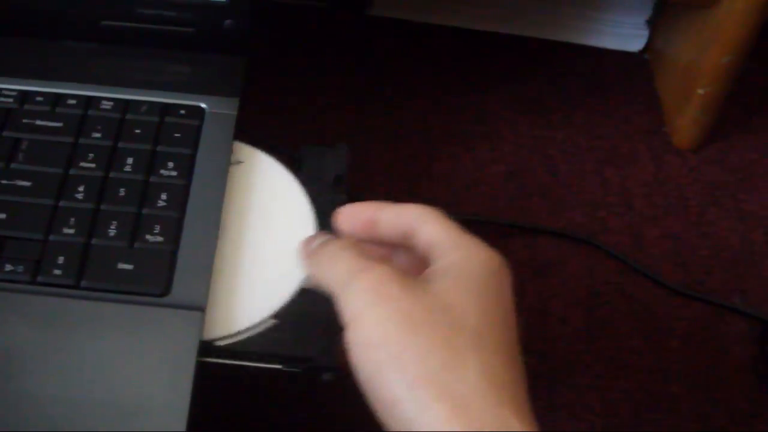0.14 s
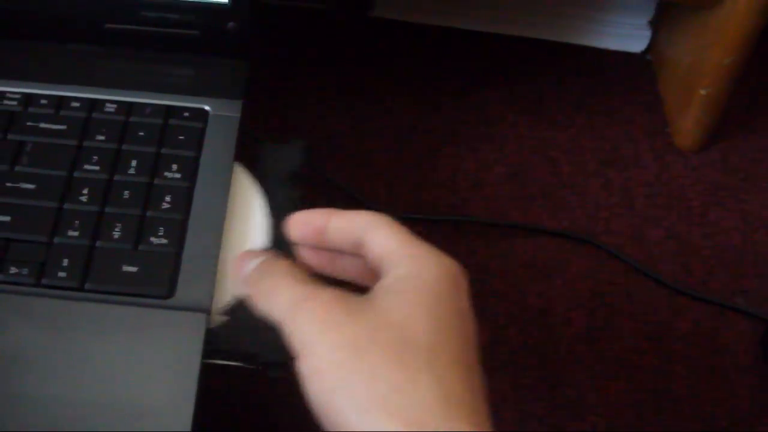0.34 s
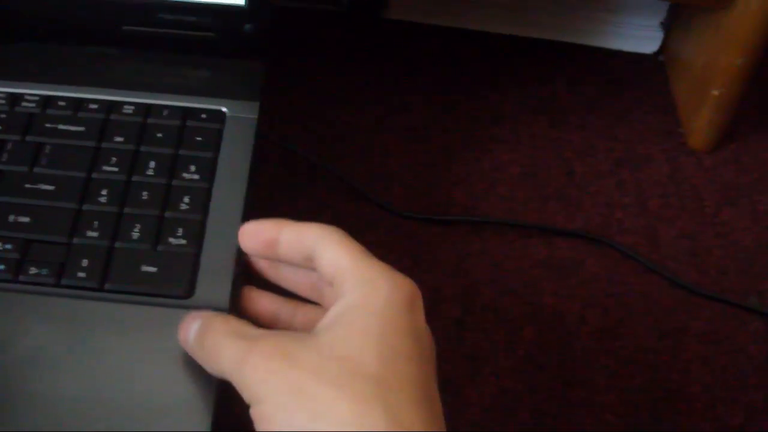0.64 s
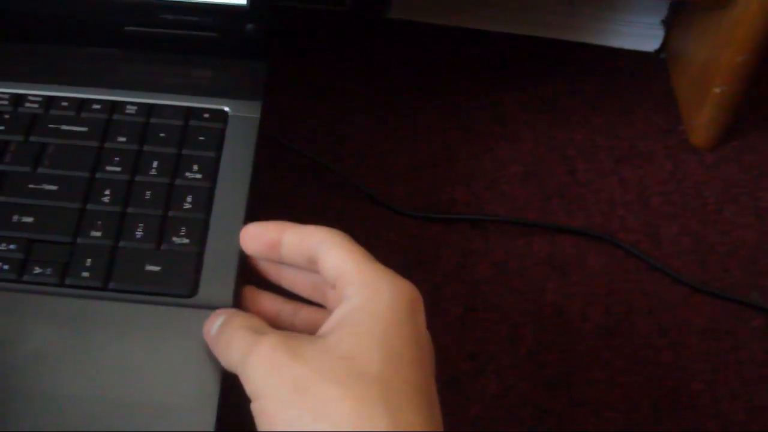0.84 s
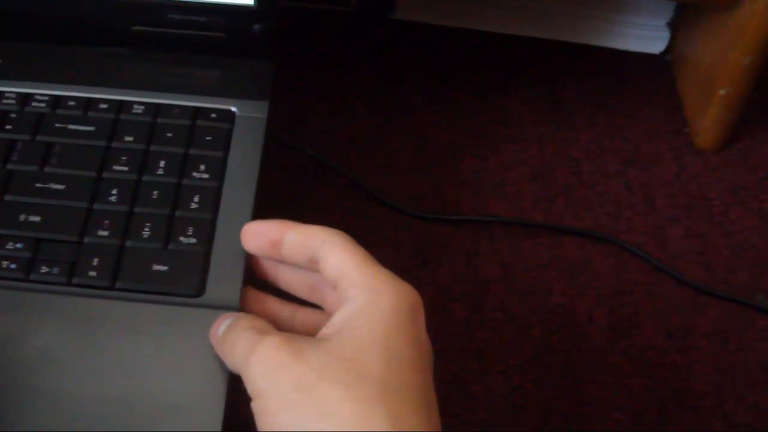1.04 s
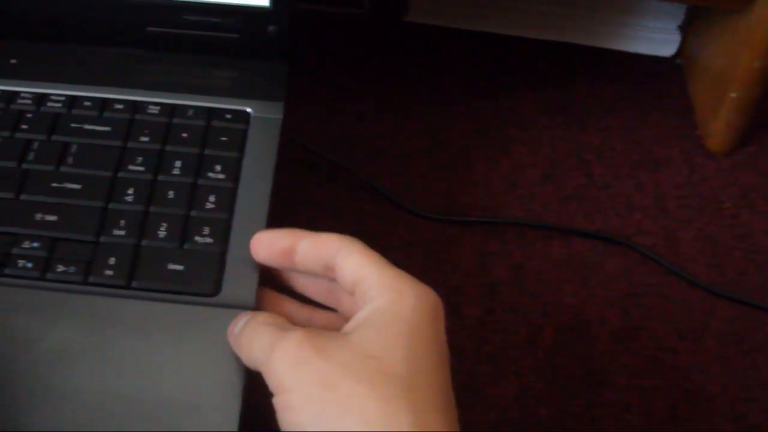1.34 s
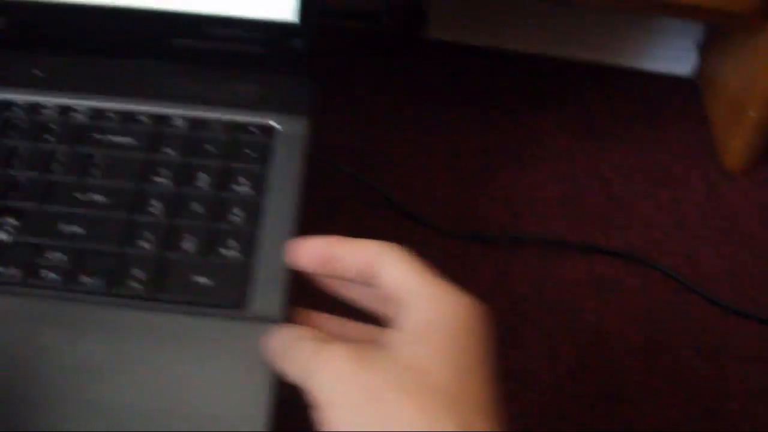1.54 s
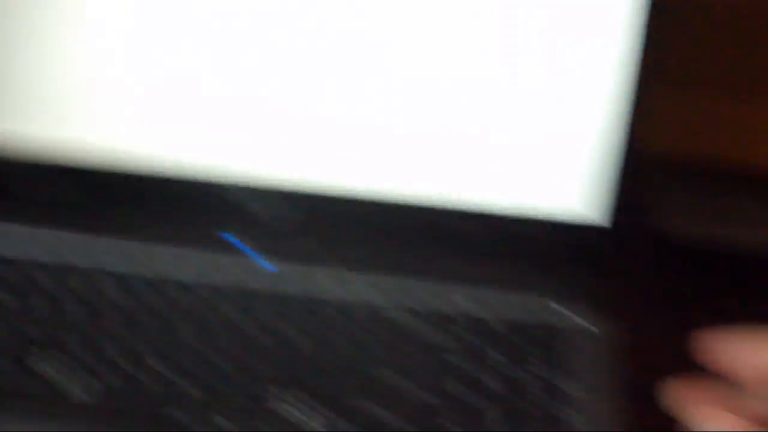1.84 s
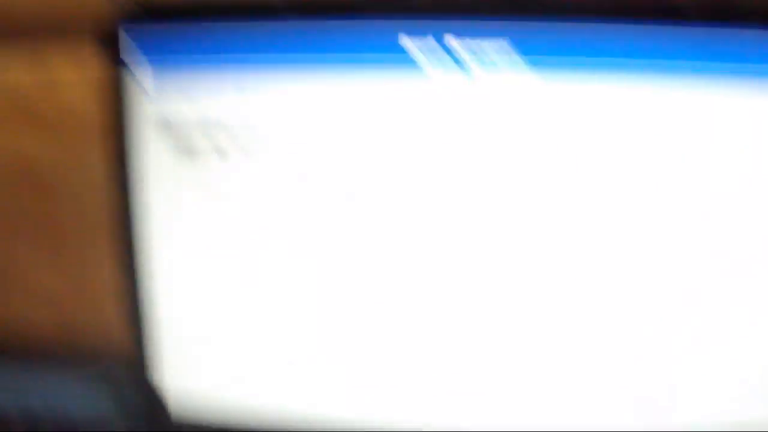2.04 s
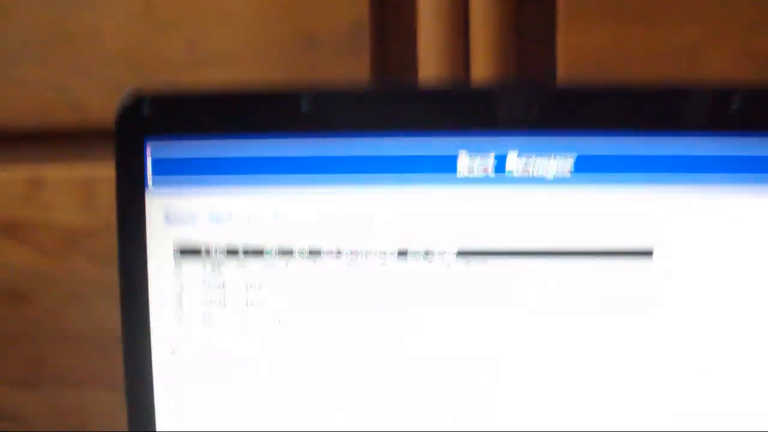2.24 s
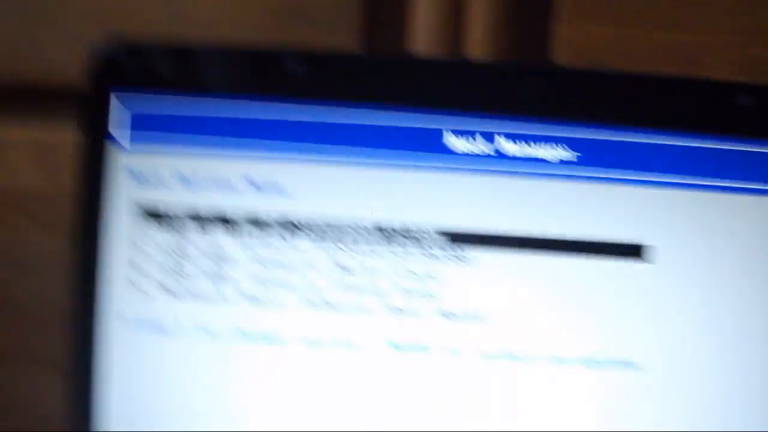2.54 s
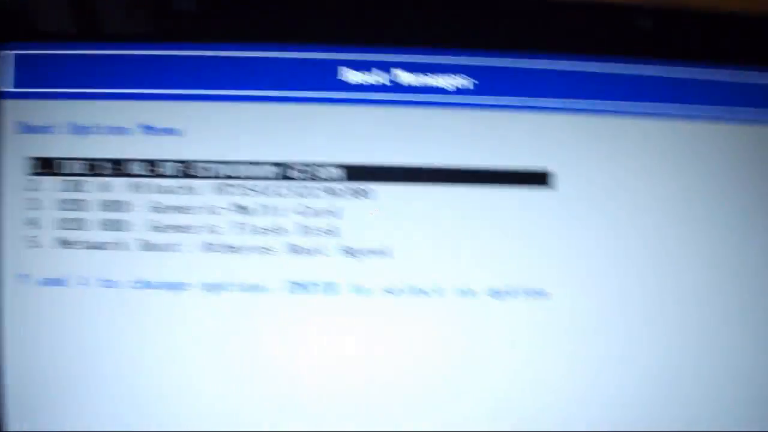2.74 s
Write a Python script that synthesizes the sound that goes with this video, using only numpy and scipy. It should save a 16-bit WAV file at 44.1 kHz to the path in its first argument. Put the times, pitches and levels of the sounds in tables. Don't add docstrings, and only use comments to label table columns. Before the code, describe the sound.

A laptop disc tray is pushed shut: faint plastic rattles at 0.1-0.2 s, a bright tick at 0.45, a latch snap at 1.0. Two clearer taps on the drive come at 1.7 and 1.95. Regripping the hand-held camera makes a much louder, cracking knock cluster at 2.4, then smaller bumps and rubs at 2.6 and 2.75. Quiet room, steady hiss, low handling rumble, thin high whine.

```python
import sys
import numpy as np
from scipy import signal
from scipy.fft import rfft, irfft
from scipy.io import wavfile
from scipy.ndimage import uniform_filter1d

SR = 44100
rng = np.random.default_rng(int(sys.argv[2]) if len(sys.argv) > 2 else 0)


def rack_gain(trim_db):
    fader = np.asarray(trim_db, float)
    return 10 ** (fader / 20)


def pcm_store(signal):
    levels = np.round(np.clip(np.atleast_2d(signal), -1, 1) * 32767)
    wavfile.write(sys.argv[1], SR, levels.astype(np.int16).T)


N = 127890
TAIL = SR // 10


def evened(x):
    return x / np.sqrt(np.mean(x ** 2) + 1e-20)


def add(mix, start_s, sound):
    part = mix[round(start_s * SR):][:len(sound)]
    part += sound[:len(part)]


def passed(x, hz, kind):
    return signal.lfilter(*signal.butter(2, hz, kind, fs=SR), x)


def resonate(x, hz, width_hz):
    pole = np.exp((2j * np.pi * hz - np.pi * width_hz) / SR)
    return 2 * signal.lfilter([1 - abs(pole)], [1, -pole], x).real


def ring(modes, more_db=0, flip=1):
    t = np.arange(TAIL) / SR
    hz, db, t60 = np.transpose(modes)[:, :, None]
    sines = rack_gain(db + more_db - 60 * t / t60) * np.sin(2 * np.pi * hz * t)
    soft_start = 1 - np.exp(-t / 0.00006)
    out = flip ** np.arange(len(hz)) @ sines * soft_start
    return out / abs(out).max()


# frequency in Hz, density in dB per Hz.
HISS_SPECTRUM = [(88, -5), (150, -4), (505, -8), (600, -7.5), (753, -8), (6680, -8), (7200, -8),
                 (7920, -9.5), (14000, -11)]
HISS_DB = -50
SWAY_DB, SWAY_HZ, SWAY_FOOT_HZ, SWAY_LUMP_DB = -62, 74.5, 60, 3.5
WHINE_DB, WHINE_HZ = -57, 7440.3


def background():
    hz = np.fft.rfftfreq(N, 1 / SR)
    hiss_noise, sway_noise, lump_noise = rng.standard_normal((3, N))
    knot_hz, knot_db = np.transpose(HISS_SPECTRUM)
    hiss_gain = rack_gain(np.interp(np.log(hz + 1), np.log(knot_hz), knot_db))
    hiss = irfft(rfft(hiss_noise) * hiss_gain, N)
    sway_gain = hz / np.hypot(hz, SWAY_FOOT_HZ) / (1 + (hz / SWAY_HZ) ** 4)
    sway = irfft(rfft(sway_noise) * sway_gain, N)
    lumps = evened(uniform_filter1d(uniform_filter1d(lump_noise, size=3000), size=3000))
    whine = np.sqrt(2) * np.sin(2 * np.pi * WHINE_HZ * np.arange(N) / SR)
    mix = rack_gain(HISS_DB) * evened(hiss)
    mix += rack_gain(SWAY_DB + SWAY_LUMP_DB * lumps) * evened(sway)
    return mix + rack_gain(WHINE_DB) * whine


# start in seconds, level in dB, t60 in seconds,
# focus (pitch of the struck part) in Hz, fall in dB per octave away from the focus.
RATTLES = [
    (0.117, -49.5, 0.037, 4000, 4),
    (0.1282, -42.5, 0.054, 6500, 3.5),
    (.128, -45.5, 0.053, 1600, 5.5),
    (0.1824, -45.5, 0.048, 1790, 5.5),
    (0.453, -38.5, 0.021, 6600, 15),
    (0.4532, -44.5, 0.15, 2150, 13),
    (0.995, -44.5, 0.035, 3000, 4),
    (1.012, -33, 0.062, 4280, 6),
    (1.012, -40, .03, 7500, 6),
    (1.021, -45, 0.25, 800, 2),
]
# frequency in Hz, width in Hz, level in dB.
TRAY = [(700, 580, -6.5), (1170, 580, -6), (1600, 450, -5), (2150, 290, -1.5), (3000, 1300, -4),
        (3950, 910, 0), (4620, 1100, -1.5), (6600, 1300, 1), (7600, 3600, -8)]


def rattle(level_db, t60, focus_hz, fall_db, noise):
    t = np.arange(len(noise)) / SR
    spiky = noise * abs(noise) ** .3
    contacts = spiky * rack_gain(-60 * t / t60) * (1 - np.exp(-t / 0.0004))
    out = np.zeros(len(noise))
    for hz, width_hz, db in TRAY:
        octaves_away = abs(np.log2(hz / focus_hz))
        tone = resonate(resonate(contacts, hz, width_hz), hz, 3 * width_hz)
        out += rack_gain(db - fall_db * octaves_away) * tone / np.sqrt(width_hz)
    onset_rms = np.sqrt(np.mean(out[:SR // 200] ** 2))
    return rack_gain(level_db) * out / onset_rms


# frequency in Hz, level in dB, t60 in seconds.
SHELL = [(3240, -5.5, 0.0021), (4280, -8, 0.0027), (5270, -1.5, 0.0043), (5740, -2.5, 0.0032),
         (6500, -2.5, 0.0048), (7340, -1.5, 0.007), (8330, -1.5, 0.0046), (9100, -11, 0.003),
         (10800, -18, 0.0024)]
SPREAD_DB = 5


def crack(level_db, chance):
    spray = chance * rack_gain(-60 * np.arange(len(chance)) / SR / 0.0037)
    mode_change_db = SPREAD_DB * chance[-len(SHELL):, None]
    out = np.convolve(spray, ring(SHELL, mode_change_db))[:TAIL]
    out = passed(out, 10200, "low")
    return rack_gain(level_db) * out / abs(out).max()


# start in seconds, level in dB, crack level in dB.
FIRST_TAP = (1.6956, -26, -40)
SECOND_TAP = (1.9413, -23, -29)
# frequency in Hz, level in dB, t60 in seconds.
FIRST_TAP_MODES = [(674, -22, .03), (1114, -11.5, .04), (1540, 2.5, 0.026), (1650, -1, 0.022),
                   (3250, -8, 0.02), (4800, -9, .01)]
SECOND_TAP_MODES = [(550, -7.5, .08), (820, -6, 0.063), (916, -8, 0.045), (1080, -7, 0.033),
                    (1310, -6, 0.033), (1600, 4.5, 0.016), (1990, -3.5, 0.048), (4000, -9.5, .03),
                    (5100, -13, 0.011)]


def tap(level_db, crack_db, modes):
    panel = passed(ring(modes), 400, "high")
    return rack_gain(level_db) * panel + crack(crack_db, rng.standard_normal(size=200))


# start in seconds, ring level in dB,
# push level in dB, crack level in dB, contact in milliseconds (negative pulls).
KNOCKS = [(2.2609, -40, -44, -73, 1), (2.268, -48, -37, -70, -2.5), (2.386, -14.5, -12, -19, 0.46),
          (2.3863, -14, -9, -11, -0.98), (2.388, -12.5, -18, -8, -0.5), (2.3888, -16.5, -21, -9.5, 0.6),
          (2.3896, -16, -21, -11, 0.5), (2.3905, -12.5, -11.5, -15, -.5), (2.3918, -19, -8, -8.5, -0.08),
          (2.3927, -19, -6.5, -15, -1.01), (2.3932, -15, -10, -36, 1.64), (2.395, -20.5, -34, -19.5, 0.7),
          (2.408, -24, -30, -57, 2), (2.5696, -24.5, -21, -16.5, -0.4), (2.6127, -33, -28, -45, 3),
          (2.6251, -22.5, -25.5, -38, -0.5), (2.6266, -15, -22, -28, 1), (2.6347, -25.5, -41, -60, 0.5),
          (2.7445, -35.5, -34.5, -60, -3), (2.751, -33, -33.5, -42, 1), (2.7545, -28.5, -30, -50, -0.54),
          (2.7553, -35, -28, -45, 1.5), (2.758, -36, -36, -50, 0.05), (2.835, -60, -43.5, -80, -9)]
# frequency in Hz, level in dB, t60 in seconds.
CASE = [(207, -11.5, 0.028), (306, -11, 0.02), (460, -5.5, .045), (558, -4.5, 0.036), (650, -5, 0.032),
        (800, -8, 0.017), (932, -3.5, 0.037), (1100, -6.5, 0.032), (1322, -11, 0.032), (1570, -4, 0.029),
        (1858, -3.5, 0.024), (2098, -7.5, 0.042)]


def knock(ring_db, push_db, crack_db, contact_ms, chance):
    push = np.hanning(max(round(abs(contact_ms) * SR / 1000), 3) + 2)
    back_swing = np.exp(-np.arange(TAIL) / (0.0016 * SR))
    move = np.convolve(push, -back_swing / back_swing.sum())[:TAIL]
    move[:len(push)] += push
    move = rack_gain(push_db) * move / abs(move).max()
    mode_change_db = SPREAD_DB * chance[-20:][:len(CASE), None]
    body = np.convolve(push / push.sum(), ring(CASE, mode_change_db, flip=-1.01))[:TAIL]
    return np.sign(contact_ms) * (move + rack_gain(ring_db) * body) + crack(crack_db, chance)


# start in seconds,
# length in seconds, level in dB, centre in Hz, width in Hz.
RUBS = [(2.9, .11, -58, 400, 555.6), (2.384, 0.038, -30.5, 130, 250), (2.391, 0.21, -47, 60, 120),
        (2.398, 0.062, -35.5, 390, 700), (2.411, 0.036, -56, 4000, 1900), (2.429, 0.17, -47.5, 594, 700),
        (2.601, 0.13, -44, 50.4, 80), (2.629, 0.076, -45.5, 730, 800), (2.745, 0.14, -46, 40, 80),
        (2.755, 0.11, -50.5, 5000, 5040), (2.756, .05, -48.5, 640, 972), (2.785, 0.069, -53.5, 466, 700)]


def rub(length_s, level_db, hz, width_hz, noise):
    progress = np.arange(round(length_s * SR)) / (length_s * SR)
    grain = evened(uniform_filter1d(noise[::-1], size=200))[:len(progress)]
    shape = np.sin(np.pi * progress ** 0.33) * rack_gain(1.5 * grain)
    drag = evened(resonate(resonate(noise, hz, width_hz), hz, width_hz))
    return rack_gain(level_db) * shape * drag[:len(progress)]


def scene():
    mix = background()
    for (start_s, *row), noise in zip(RATTLES, rng.standard_normal((len(RATTLES), SR // 4))):
        add(mix, start_s, rattle(*row, noise))
    for (start_s, level_db, crack_db), modes in ((FIRST_TAP, FIRST_TAP_MODES), (SECOND_TAP, SECOND_TAP_MODES)):
        add(mix, start_s, tap(level_db, crack_db, modes))
    for (start_s, *row), noise in zip(RUBS, rng.standard_normal((len(RUBS), SR))):
        add(mix, start_s, rub(*row, noise))
    for (start_s, *row), chance in zip(KNOCKS, rng.standard_normal(size=(len(KNOCKS), 200))):
        add(mix, start_s, knock(*row, chance))
    return np.array([mix, mix])


def roll_off(x):
    return signal.sosfilt(signal.butter(12, 15350, fs=SR, output="sos"), x)


def record(dry):
    lowpass = signal.firwin(511, 14400, window=("kaiser", 9), fs=SR)
    left, right = signal.oaconvolve(dry, lowpass[None], "same")
    mix = np.array([np.roll(left, 1), right]) + .0117
    return roll_off(mix)


dry = scene()
out = record(dry)
pcm_store(out)
```